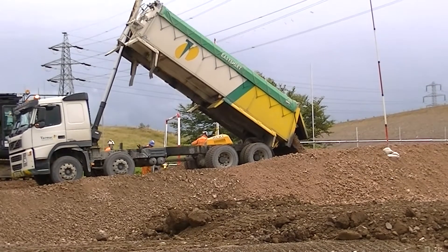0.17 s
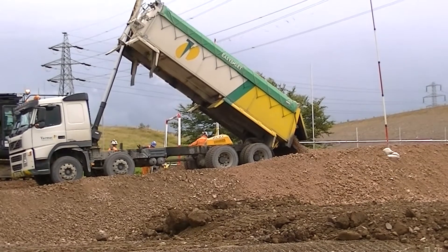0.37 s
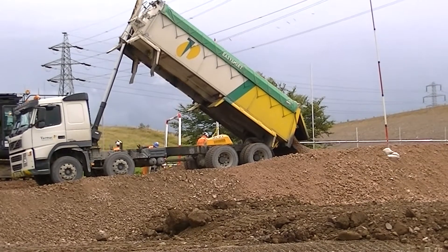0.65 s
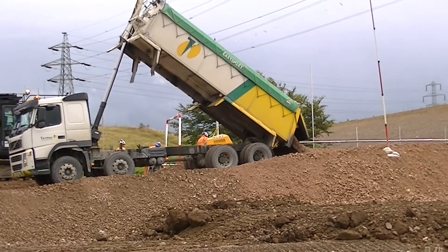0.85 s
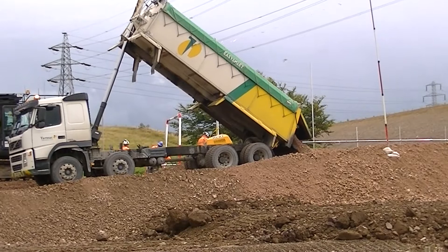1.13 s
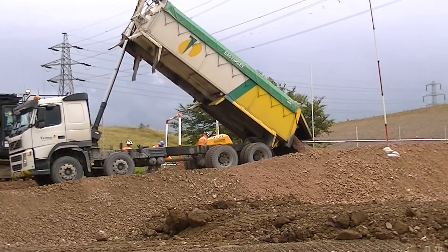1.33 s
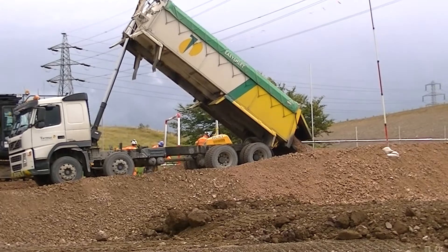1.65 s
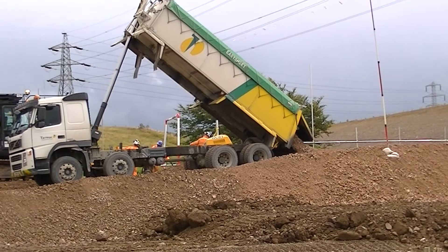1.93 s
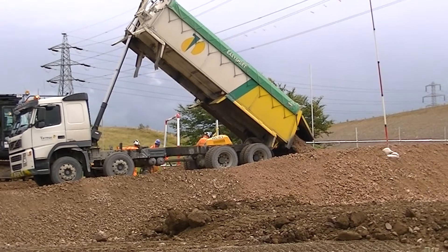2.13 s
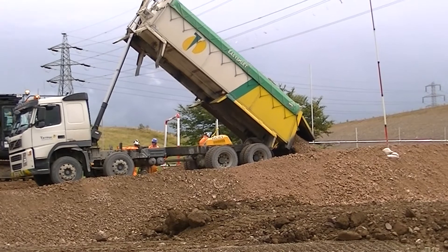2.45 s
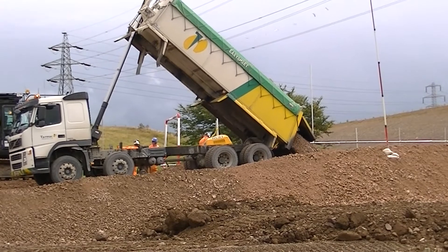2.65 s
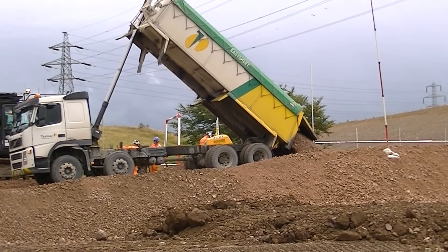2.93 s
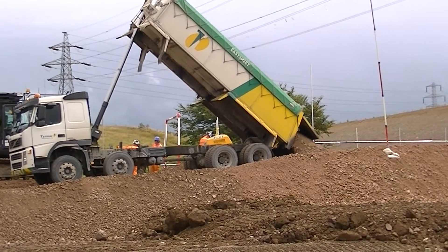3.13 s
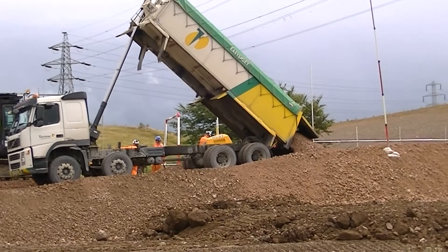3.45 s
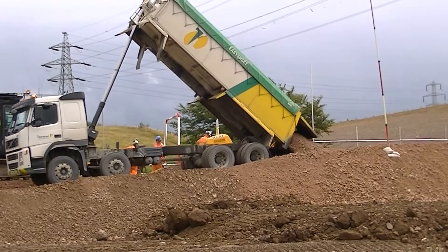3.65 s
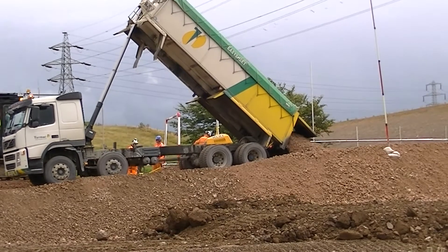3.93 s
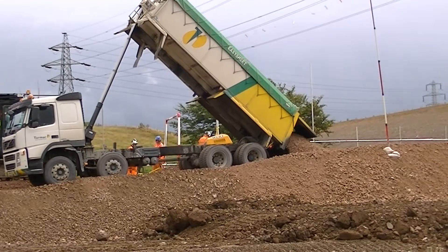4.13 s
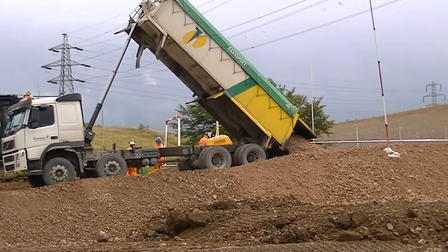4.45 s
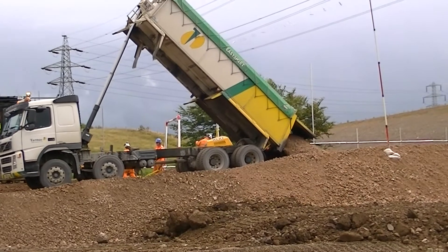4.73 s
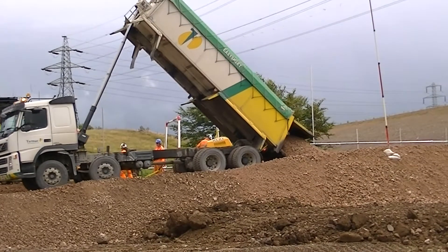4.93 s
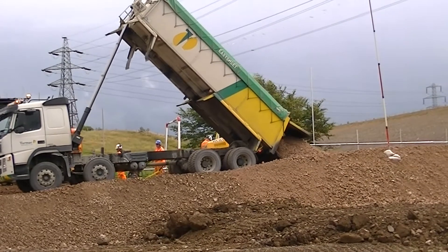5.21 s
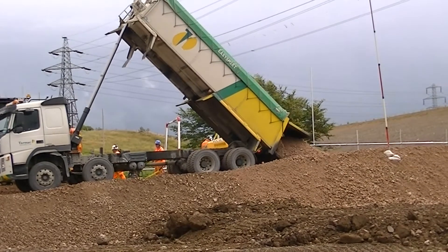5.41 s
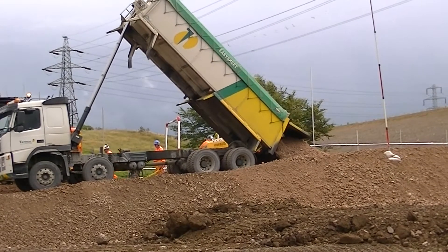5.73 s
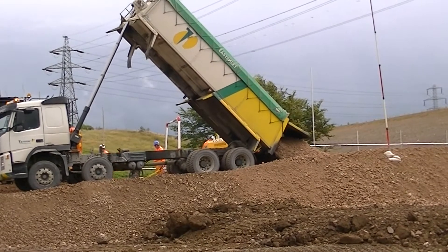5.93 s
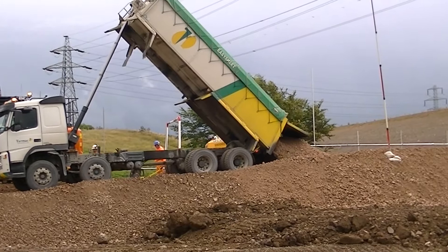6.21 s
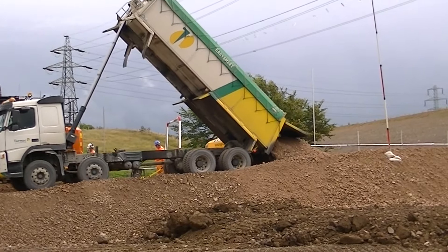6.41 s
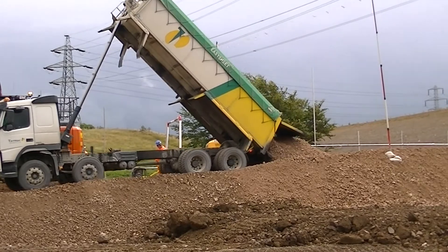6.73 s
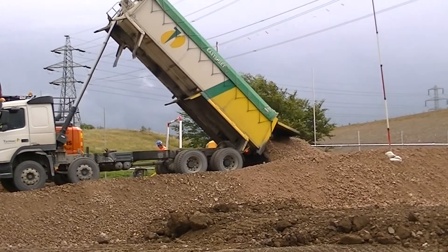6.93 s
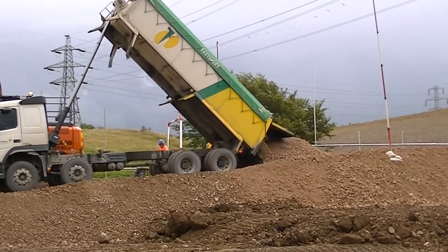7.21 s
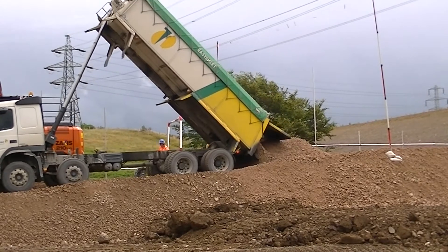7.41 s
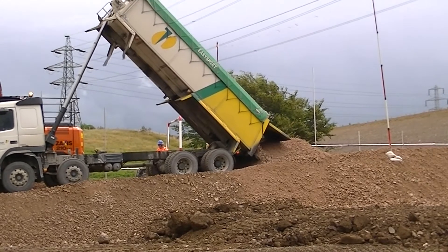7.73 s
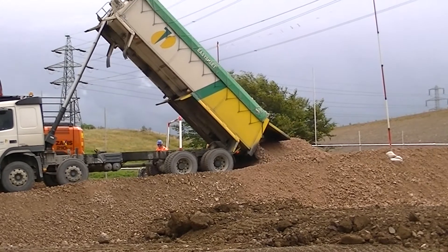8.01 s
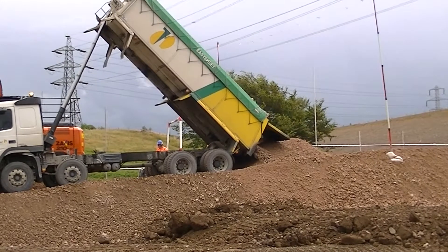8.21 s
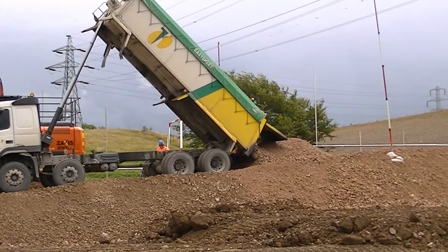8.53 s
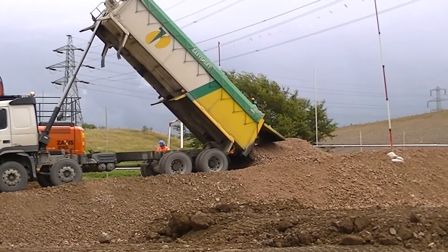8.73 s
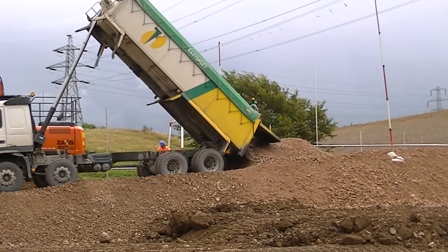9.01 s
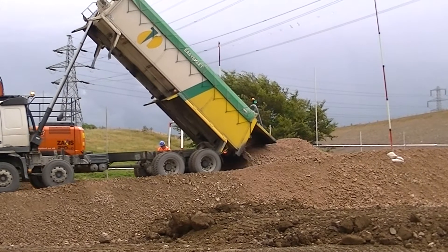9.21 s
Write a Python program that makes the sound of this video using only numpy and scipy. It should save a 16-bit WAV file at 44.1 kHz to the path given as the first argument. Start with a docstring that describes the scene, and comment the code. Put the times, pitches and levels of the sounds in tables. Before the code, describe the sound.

Outdoor construction site, microphone some way off, thin bass, narrow, nearly mono picture. From 0 s crushed stone slides down a raised steel body: a steady, grainy, mid-range roar made of dense small knocks, with steel clatter, gritty treble and little dust hiss. Small surges come and go; a sharp clack at 0.4 s, others near 1.4 and 2.4 s. At 2.8-3.1 s a bright cluster of cracks and rattling stones. The pour slackens, dropping suddenly at 4.1 s, and recovers by 4.7-5 s with short scraping tones. It dips again at 5.6 s, then builds from 6.7 s to its loudest at 9.4 s, duller and rounder as stones land on the heap, with several clacks from 8 s. Beneath: low engine rumble, a faint wavering pump whine, and soft rapid chuffs of hiss, clearest around 3-3.6 and 6-7.4 s. The picture widens slightly near 8 s, then narrows.

```python
"""Tipper lorry shedding crushed stone

Some way off, a load of stone slides out of a raised steel body onto a heap.
Noise and random impacts, coloured by body, heap and steel, make the roar; decaying sines make its clatter.
Engines rumble as low noise, one chuffs in bursts of treble hiss, and the tipping pump whines in blurred partials.
Faint wandering tones come and go, and large stones clack out as short cracks with two-pitch rings.
The bass is thin and the stereo picture narrow."""
import sys
import numpy as np
from scipy import signal
from scipy.fft import rfft, irfft, next_fast_len
from scipy.io import wavfile
from scipy.ndimage import uniform_filter1d, map_coordinates

SR = 44100
rng = np.random.default_rng(int(sys.argv[2]) if len(sys.argv) > 2 else 0)


def persist_wave(psi):
    """Save psi, clipped to +-1, as 16-bit WAV."""
    counts = np.round(np.clip(psi, -1, 1) * 32767).astype(np.int16)
    wavfile.write(sys.argv[1], SR, np.atleast_2d(counts).T)


N = 412776  # length in samples


def amp(db):
    """Gain of a level in dB."""
    return 10 ** (np.asarray(db) / 20)


def unit(x):
    """x at rms 1."""
    return x / np.sqrt(np.mean(x ** 2) + 1e-20)


def noise():
    """White noise for the whole scene."""
    return rng.standard_normal(N)


def along(points, hz):
    """Values at hz from (f/Hz, value) points on a log frequency axis."""
    f, value = np.transpose(points)
    return np.interp(np.log(hz + 1), np.log(f + 1), value)


def curves(rows):
    """One value per sample for each column after the time."""
    times, *columns = np.transpose(rows)
    return [np.interp(np.arange(N) / SR, times, column) for column in columns]


def swells(rows, gain):
    """Sum of bell-shaped swells from rows of (t/s, height, half length/s)."""
    t = np.arange(N) / SR
    return sum(gain(height) * np.exp(-.5 * ((t - centre) / half) ** 2) for centre, height, half in rows)


def wobble(rate):
    """A smooth random curve, rate knots a second."""
    knots = rng.standard_normal(int(N * rate / SR) + 4)
    return map_coordinates(knots, [np.arange(N) * rate / SR])


def filtered(x, response):
    """x times a response of frequency."""
    m = next_fast_len(N + SR // 2)
    spectrum = rfft(x, m) * response(np.fft.rfftfreq(m, 1 / SR))
    return irfft(spectrum, m)[..., :N]


def coloured(x, spectrum):
    """x through a spectrum that closes beyond its ends, at rms 1."""
    closed = [(spectrum[0][0] / 2, -120), *spectrum, (spectrum[-1][0] * 2, -120)]
    return unit(filtered(x, lambda hz: amp(along(closed, hz))))


def fuzzy(hz, width_hz):
    """A tone whose strength and phase wander: a line about width_hz wide, rms 1."""
    phase = 2 * np.pi * np.cumsum(hz * np.ones(N)) / SR
    in_step = (1.57 + wobble(width_hz)) * np.cos(phase)
    return unit(in_step + wobble(width_hz) * np.sin(phase))


def patchy(x, depth_db):
    """Patches of random gain in time and frequency: clumps of larger or smaller stones."""
    z = signal.stft(x, nperseg=512)[2]
    field = uniform_filter1d(rng.standard_normal(z.shape), size=6, axis=0)
    field = uniform_filter1d(field, size=10, axis=1)
    return signal.istft(z * amp(depth_db * unit(field)), nperseg=512)[1][:N]


def impacts(share, scatter_db):
    """A blur of countless small knocks, with single stones of uneven size as a share of the power."""
    chance, size, blur = rng.random(N), rng.exponential(size=N), noise()
    struck = chance < 2500 / SR  # 2500 stones a second on average
    stones = struck * amp(scatter_db * np.minimum(size, 4)) * np.sign(blur)
    share = np.clip(share, 0, 1)
    return np.sqrt(1 - share) * blur + np.sqrt(share) * unit(stones)


# how hard the load pours: (t/s, roar level/dB)
POUR = [(0, -24), (.6, -24.5), (1.9, -25), (3.1, -26), (3.98, -26), (4.12, -32), (4.28, -31.5), (4.42, -30),
        (4.61, -26), (5, -24), (5.3, -23.5), (5.57, -30), (5.62, -27), (6.7, -24), (7.2, -21.5),
        (7.66, -23.5), (8.35, -21), (8.8, -21.5), (9, -20), (9.36, -19.5)]
USUAL_POUR_DB, DUST_FOLLOWS = -22, 0.7  # reference level; dB of dust for each dB of pour
# a slab of the load lets go at once: (t/s, level over the pour/dB, half length/s)
SURGES = [(.3, 1, .04), (.65, 1, 0.05), (.85, 0.5, .02), (.93, 2.5, 0.038), (.99, 1.5, 0.0099),
          (1.265, 1.5, 0.0095), (1.62, 1.5, 0.04), (1.97, 2, 0.058), (2.25, 2, 0.037), (2.4, 2.5, 0.017),
          (2.97, 0.5, 0.035), (3.76, 1.5, 0.033), (4.86, 0.5, 0.023), (5.04, 1, .03), (5.2, 0, 0.037),
          (8.96, 0.5, 0.029), (9.12, 1.5, 0.012)]
# how far the roar has moved to the heap: (t/s, heap share 0-1)
LANDING = [(0, 0.26), (4.4, 0), (5.6, 0.01), (6.8, 0.44), (7.6, 0.63), (8.2, 0.96), (9.4, 1)]
# treble layers against the roar: (t/s, steel clatter level/dB, grit level/dB, dust level/dB)
TREBLE = [(0, -3.5, -7, -27), (1.4, -1.5, -5.5, -26), (2.3, -2, -6.5, -26.5), (2.75, -3, -7, -27.5),
          (4.1, -3.5, -7, -26.5), (4.6, -2, -6, -26.5), (5.9, -3, -5.5, -25.5), (6.2, -4.5, -7.5, -27.5),
          (6.9, -2.5, -6.5, -26), (7.47, -4, -8, -27.5), (7.62, -4.5, -10, -29), (8.35, -6, -13, -33),
          (8.7, -2.5, -10, -32.5), (9.1, -8, -12.5, -27.5), (9.4, -5.5, -10, -30)]
# loose stones rattle down the steel: (t/s, grit lift level/dB, half length/s)
RATTLES = [(2.98, 5.5, 0.025)]
# relative spectra of the layers, each (f/Hz, level/dB): stones in the loaded steel body
BODY = [(400, -18), (470, -18.5), (520, -6.5), (560, -1.5), (680, -2), (760, 2.5), (860, -2.5), (1000, 2),
        (1220, 1), (1400, -2), (2200, -58), (3500, -62)]
# the heap they land on: (f/Hz, level/dB)
HEAP = [(300, -18.5), (450, -13.5), (600, -7), (660, -4), (800, -1), (950, 2.5), (1130, 0.5), (1300, -3.5),
        (1500, -5), (2200, -76), (3500, -55)]
# clatter on steel: (f/Hz, level/dB)
STEEL = [(900, -97), (1300, -17), (1600, 2.5), (1900, 4), (2200, 0), (2550, -4.5), (3200, -20), (5000, -44)]
# grit: (f/Hz, level/dB)
GRIT = [(1500, -3.5), (2500, -4), (3000, 2.5), (3500, -2), (4300, -3.5), (4900, -9.5), (5500, -11),
        (7000, -30.5), (10000, -64)]
# dust, the finest hiss: (f/Hz, level/dB)
DUST = [(4000, -9.5), (6500, 0), (8000, 0), (10600, -6), (12500, -14.5), (14500, -21), (15600, -36)]
# faint low noise that follows the pour's level: (f/Hz, level/dB)
DEEP = [(20, -2), (125, -4.5), (170, 1.5), (220, -18)]


def pour():
    """The same impacts sound in body, heap and steel; grit and dust follow the same small slips of the load."""
    roar_db = curves(POUR)[0] + swells(SURGES, float)
    landing = np.clip(curves(LANDING)[0], 0, 1)
    steel_db, grit_db, dust_db = curves(TREBLE)
    rattle_db = swells(RATTLES, float)
    steel_db = steel_db + 0.25 * rattle_db
    grit_db = grit_db + rattle_db
    # the whole pour is scaled by roar_db below, so this leaves the dust its own slope
    dust_db = dust_db + (DUST_FOLLOWS - 1) * (roar_db - USUAL_POUR_DB)

    slip = wobble(9) + 1.3 * wobble(25)
    coarse = patchy(impacts(share=0.086, scatter_db=4.5), depth_db=0.64)
    fine = patchy(impacts(share=0.19, scatter_db=4.5), depth_db=0.68)

    in_body = (1 - landing) * coloured(coarse, BODY)
    on_heap = landing * coloured(coarse, HEAP)
    roar = amp(0.3 * slip) * (in_body + on_heap)
    steel = amp(steel_db + 0.17 * slip) * coloured(coarse, STEEL)
    grit = amp(grit_db + 0.1 * slip + 0.039 * wobble(28)) * coloured(fine, GRIT)
    dust = amp(dust_db + 0.67 * slip + 0.31 * wobble(8.1)) * coloured(fine, DUST)
    low = amp(-44.5) * coloured(noise(), DEEP)
    clatter = amp(KNOCK_DB) * knocks()
    return amp(roar_db) * (roar + steel + grit + dust + low + clatter)


KNOCKS_PER_S, KNOCK_DB = 320, -11  # mean rate; level against the roar
KNOCK_HZ, KNOCK_SPREAD = 1497, 0.497  # middle pitch; spread in natural-log units
KNOCK_CYCLES = 14.3  # cycles for a ring to die by 27 dB
KNOCK_RANGE_DB = 10  # range of strengths at one pitch


def knocks():
    """Middling stones, each ringing a few cycles at a pitch of its own: the clatter in the roar."""
    count, t = 3000, np.arange(700) / SR
    draw = rng.random((count, 2))
    hz = KNOCK_HZ * np.exp(KNOCK_SPREAD * rng.standard_normal((count, 1)))
    hz = np.clip(hz, 700, 4000)
    size = amp(KNOCK_RANGE_DB * draw[:, 1:]) * KNOCK_HZ / hz  # small stones ring higher and weaker
    attack = 1 - np.exp(-hz * t / 2)
    decay = np.exp(-hz * t / KNOCK_CYCLES * np.pi)
    rings = size * np.sin(2 * np.pi * hz * t) * decay * attack

    gaps = -np.log(1 - draw[:, :1]) / KNOCKS_PER_S  # seconds between random arrivals
    start = (np.cumsum(gaps, axis=0) * SR).astype(int) % N
    where = start + np.arange(len(t))
    return unit(np.bincount(where.ravel(), rings.ravel(), minlength=N)[:N])


# engine rumble at the usual pour: (t/s, level/dB)
RUMBLE = [(0, -46), (2, -42), (3.9, -45), (4.7, -41), (7, -41), (9, -38), (9.4, -49)]
RUMBLE_FOLLOWS = 0.23  # dB of rumble for each dB of pour
# relative spectrum of the rumble: (f/Hz, level/dB)
ENGINES = [(140, -31), (200, -17), (270, -8.5), (340, -4), (420, -1.5), (520, -3), (800, -28.5)]
# relative spectrum of a machine idling as it draws away: (f/Hz, level/dB)
IDLING = [(100, -14), (140, -14.5), (200, 0), (270, -1), (330, -7)]
# shaft of the chuffing engine: (t/s, turns made so far)
SHAFT = [(0, -.48), (3.2, 74.71), (6, 140.7), (6.9, 161.63), (9.4, 220.5)]
# spells in which the chuff comes through: (t/s, level/dB, half length/s)
CHUFFS = [(2.25, -66, .1), (2.75, -60, .02), (3.13, -56, 0.06), (3.27, -59, .04), (3.56, -58, .05),
          (4.6, -71, 0.29), (5.6, -66, 0.13), (5.99, -57, 0.08), (6.38, -54, 0.07), (6.5, -62, 0.038),
          (6.62, -55, .06), (6.95, -57, 0.063), (7.4, -61, .06)]
# relative spectrum of the hiss in a puff: (f/Hz, level/dB)
VALVE = [(5000, -25), (8000, 4), (10000, 3.5), (13000, -7), (15600, -12)]


def engines():
    """A low rumble that swells with the pour, a fading idle, and one puff of hiss at every turn of a shaft."""
    rumble_db = curves(RUMBLE)[0] + RUMBLE_FOLLOWS * (curves(POUR)[0] - USUAL_POUR_DB)
    rumble = amp(rumble_db + 1.3 * wobble(8)) * coloured(noise(), ENGINES)
    idle = amp(np.linspace(-54, -61, N)) * coloured(noise(), IDLING)

    turns = curves(SHAFT)[0] + 0.03 * wobble(18)
    strength = amp(1.5 * rng.standard_normal(300))[np.round(turns).astype(int)]  # puffs differ
    puffs = strength * np.exp(1.1 * (np.cos(2 * np.pi * turns) - 1))
    chuff_gain = amp(-73) + swells(CHUFFS, amp)
    chuff = chuff_gain * unit(puffs) * coloured(noise(), VALVE)
    return rumble + idle + chuff


# whine of the tipping pump: (t/s, tooth rate f/Hz, level before the partial's own/dB)
PUMP = [(0, 191.6, -51), (1.7, 188.5, -41.5), (2.8, 191.8, -59), (4.1, 198.7, -45.5), (4.6, 197.2, -64),
        (5.1, 192.6, -40), (5.55, 189.4, -48.5), (6.3, 186.3, -45.5), (9.4, 180.9, -48.5)]
# partials of the whine: (multiple of the tooth rate, level/dB)
PUMP_PARTIALS = [(2, -8.5), (3, 1.5), (4, 1)]
PUMP_WAVER_DB = 3


def pump():
    """Blurred partials of the tooth rate, wider the higher they lie; each wavers on its own."""
    hz, level_db = curves(PUMP)
    whine = 0
    for k, db in PUMP_PARTIALS:
        gain = amp(level_db + db + PUMP_WAVER_DB * wobble(5))
        whine = whine + gain * fuzzy(round(k) * hz, 35 * k)
    return whine


# passing tones, likely scraped steel and engine hum: (start t/s, length/s, f/Hz, width f/Hz, level/dB)
SCRAPES = [(0, 0.95, 765, 69, -37), (0, 1.3, 249.3, 9.1, -57.5), (1.6, 0.26, 572, 35, -35),
           (1.9, 1.26, 269, 12.4, -53.5), (2.2, 1.4, 196, 9.5, -59.5), (3.396, 0.53, 209.4, 19, -57.5),
           (2.88, .16, 3780, 300, -41), (2.89, .17, 4350, 130, -41), (2.94, .1, 2980, 180, -37),
           (3.25, 0.2, 1190, 60, -27), (3.913, 0.56, 312, 14, -59), (4.75, .6, 273.5, 16, -59),
           (4.702, 0.56, 403, 25, -44.5), (4.797, 0.3, 759, 37, -33), (4.87, 0.46, 1098, 30, -39)]


def scrapes():
    """Faint tones, likely panels scraped by the load and engine hum; each swells and fades."""
    t = np.arange(N) / SR
    tones = 0
    for start, length, hz, width_hz, db in SCRAPES:
        progress = np.clip((t - start) / length, 0, 1)
        swell = np.sqrt(np.abs(np.sin(np.pi * progress)))
        tones = tones + amp(db) * swell * fuzzy(hz, width_hz)
    return tones


# large stones: (t/s, level before shaping/dB, ring f/Hz, partner f/Hz, share of crack 0-1)
CLACKS = [(0.4095, -6, 1520, 2320, 0.9), (1.168, -21, 1210, 2050, .4), (1.39, -8, 700, 1220, 0.37),
          (1.643, -10, 1000, 1510, .3), (2.404, -11, 2050, 1050, 0.1), (2.816, -15, 3000, 4100, .5),
          (2.858, -19, 3900, 4600, 0.1), (2.875, -14, 2950, 1750, 0.2), (2.883, -5.5, 1770, 3270, 0.3),
          (2.9502, -13, 1630, 2060, .4), (3.021, -14, 3620, 3020, 0.34), (3.162, -19, 2960, 3900, .3),
          (4.829, -12, 980, 1500, 0.2), (6.9614, -9, 1890, 2100, 0.2), (7.9232, -10, 1227, 2060, .4),
          (8.097, -17, 960, 1500, .3), (8.202, -15, 940, 1500, .3), (8.25, -8, 950, 1400, 0.1),
          (8.3, -8, 920, 1400, .2), (8.595, -11, 980, 1500, .3), (8.6193, -14, 1470, 2227, .4),
          (9.113, -21, 1247, 2250, .4), (9.176, -15, 1380, 2140, 0.2)]
CRUNCH = 0.15  # gain of the splinters under each clack


def clacks():
    """Each large stone cracks on the plate and rings briefly at two pitches of its own."""
    out, t = np.zeros(N + SR), np.arange(SR // 10) / SR
    # bending waves: the treble arrives first, so the crack dives from 4150 towards 1350 Hz
    sweep = 1350 * t + 2800 * 0.0012 * (1 - np.exp(-t / 0.0012))
    crack = np.sin(2 * np.pi * sweep) * np.exp(-(t / 0.0025) ** 2)
    attack = 1 - np.exp(-t / 0.0008)
    decay = amp(-60 * t / 0.03)  # 60 dB in 30 ms
    grit = coloured(noise(), GRIT)
    for s, db, hz, partner_hz, share in CLACKS:
        start = round(s * SR)
        ring = (np.sin(2 * np.pi * hz * t) + 0.76 * np.sin(2 * np.pi * partner_hz * t)) * decay
        splinters = CRUNCH * grit[start:][:len(t)] * decay
        share = np.clip(share, 0, 1)
        clack = (1 - share) * 0.79 * ring + share * crack + splinters
        out[start:][:len(t)] += amp(db) * attack * clack
    return out[:N]


# how far the stereo picture opens: (t/s, amount 0-1)
OPENING = [(0, 0), (3.8, 0), (4.6, 0.1), (7.2, 0.28), (7.6, 0.7), (8.2, 1), (9, 0.86), (9.4, 0)]
# constant left-right difference over their sum: (f/Hz, part in step, part a quarter turn ahead)
DIFFERENCE = [(150, 0, 0.011), (300, 0, -0.058), (460, 0, -0.081), (600, 0, 0.0024), (2200, 0, 0.024),
              (4000, 0, 0.071), (6500, 0.045, .04), (9000, 0, 0)]
# left-right difference added as the picture opens: (f/Hz, part in step, part a quarter turn ahead)
OPENED = [(200, 0, 0.028), (400, 0, 0.068), (650, 0, 0.0066), (1100, 0.0014, 0.059), (2000, .03, 0.12),
          (4000, 0.036, 0.06), (7000, .05, .04), (9500, 0, 0.0087)]
# diffuse sound, opposite in the two channels, before its lift with OPENING: (f/Hz, level/dB)
SPREAD = [(40, -36), (120, -44), (350, -45), (520, -59), (700, -32.5), (1300, -63), (2400, -31),
          (4400, -25), (7500, -17), (10000, -74)]


def scene():
    """Two nearly equal channels that differ more as the picture opens, with a little diffuse smeared sound."""
    mid = pour() + engines() + pump() + scrapes() + clacks()
    opening = curves(OPENING)[0]

    def parted(rows):
        """The left-right difference: a complex filter shifts both level and phase."""
        in_step, ahead = [r[:2] for r in rows], [r[::2] for r in rows]
        return filtered(mid, lambda hz: along(in_step, hz) + 1j * along(ahead, hz))

    smear = rng.standard_normal(4000) * np.hanning(4000)  # 91 ms of noise
    diffuse = signal.fftconvolve(mid, smear / np.linalg.norm(smear))[:N]
    diffuse = filtered(diffuse, lambda hz: amp(along(SPREAD, hz)))
    side = parted(DIFFERENCE) + opening * parted(OPENED) + amp(2.9 * opening) * diffuse
    return np.array([mid + side, mid - side])


TOP_HZ = 15617  # band limit


def record(dry):
    """A steep band limit removes everything from TOP_HZ up."""
    return filtered(dry, lambda hz: hz < TOP_HZ)


dry = scene()
out = record(dry)
persist_wave(out)
```